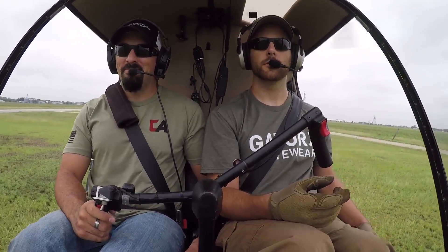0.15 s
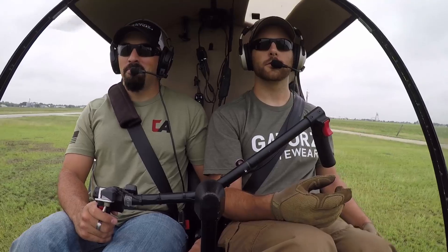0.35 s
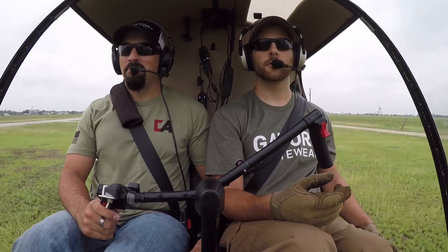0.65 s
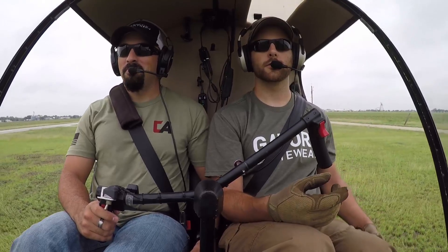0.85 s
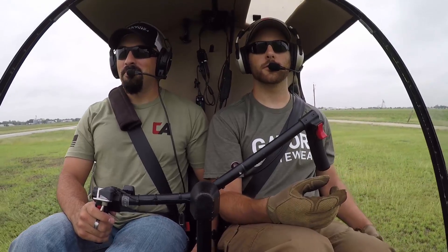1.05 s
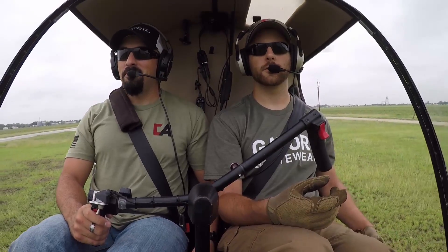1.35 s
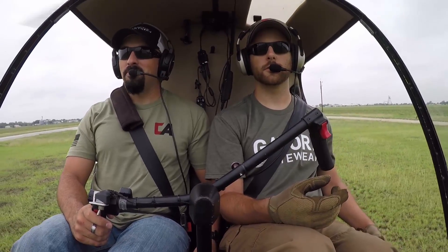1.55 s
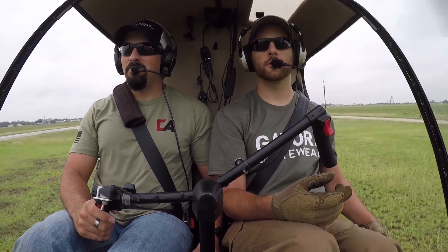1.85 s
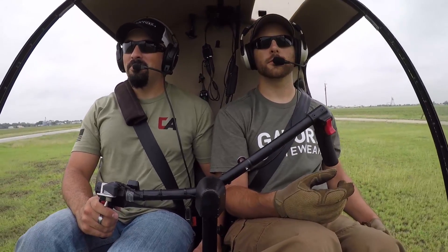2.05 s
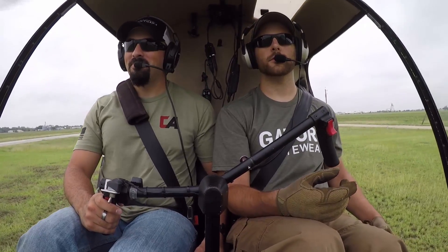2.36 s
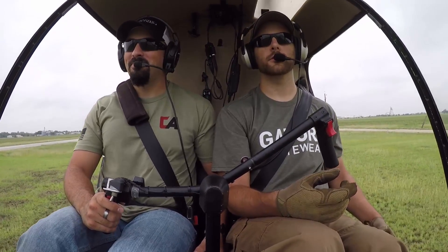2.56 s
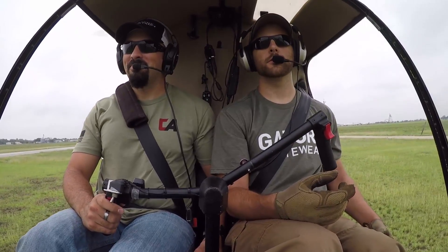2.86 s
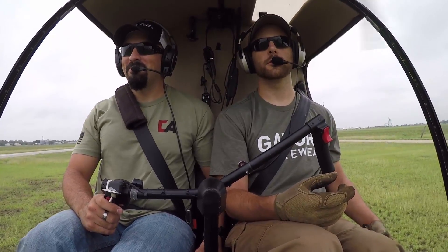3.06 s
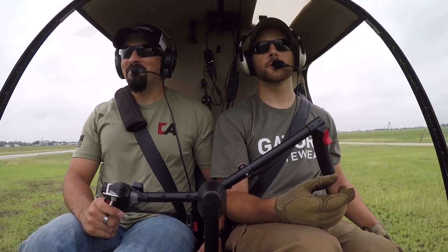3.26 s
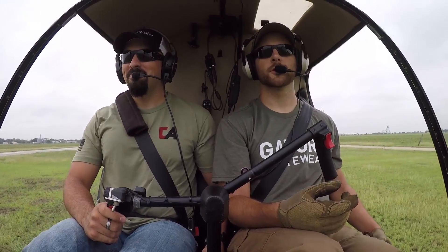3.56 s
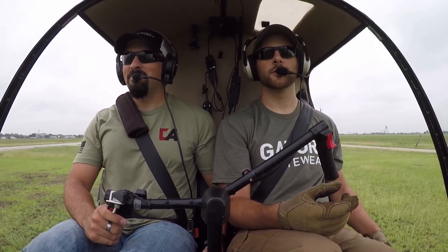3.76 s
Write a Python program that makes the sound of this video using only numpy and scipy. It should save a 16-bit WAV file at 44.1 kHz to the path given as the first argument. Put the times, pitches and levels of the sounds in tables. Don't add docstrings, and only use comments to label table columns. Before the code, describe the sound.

A small piston-engine helicopter drones steadily from inside its cabin, deep boom over muffled roar.

```python
import sys
import numpy as np
from scipy import signal
from scipy.fft import rfft, irfft, next_fast_len
from scipy.io import wavfile
from scipy.ndimage import uniform_filter1d, map_coordinates

SR = 44100
rng = np.random.default_rng(int(sys.argv[2]) if len(sys.argv) > 2 else 0)


def rack_gain(trim_db):
    fader = np.asarray(trim_db, float)
    return 10 ** (fader / 20)


def dump(signal):
    limited = np.clip(np.atleast_2d(signal).T, -1, 1)
    pcm = np.round(limited * 32767).astype(np.int16)
    wavfile.write(sys.argv[1], SR, pcm)


N = 171990


def unit(x):
    return x / np.sqrt(np.mean(x ** 2) + 1e-20)


def along(points, hz):
    f, v = np.transpose(points)
    return np.interp(np.log(hz + 1), np.log(f + 1), v)


def curve(rows):
    return np.interp(np.arange(N) / SR, *np.transpose(rows))


def wobble(rate):
    knots = rng.standard_normal(int(N * rate / SR) + 4)
    return map_coordinates(knots, [np.arange(N) * rate / SR])


def filtered(x, response):
    m = next_fast_len(N + 8192)
    return irfft(rfft(x, m) * response(np.fft.rfftfreq(m, 1 / SR)), m)[..., :N]


def anywhere(k):
    return rng.uniform(-np.pi, np.pi)


# (frequency [Hz], spectral level [dB per Hz])
SHARED_HISS = [(1470, -21), (2500, -2.5), (3490, -3), (10800, -4), (15200, -4)]
# (frequency [Hz], spectral level [dB per Hz])
SIDE_HISS_COLOUR = [(2000, -13), (3600, -9), (4300, -21), (5000, -5), (5800, -7), (6500, -11), (7300, -17),
                    (8000, -49)]


def hiss():
    shared_db, side_db, flicker_db = -62, -81.5, 3
    noise = rng.standard_normal((2, N))
    shared = filtered(noise[0], lambda hz: rack_gain(along(SHARED_HISS, hz)) * (hz > 1500) * (hz < 15300))
    side = filtered(noise[1], lambda hz: rack_gain(along(SIDE_HISS_COLOUR, hz)) * (hz > 1800))
    mid = rack_gain(shared_db) * unit(shared)
    side = rack_gain(side_db + flicker_db * wobble(30.2)) * unit(side)
    return np.array([mid + side, mid - side])


# (time [s], firing rate [Hz])
FIRING_RATE = [
    (0, 88.3),
    (.9, 88.45),
    (1.5, 88.53),
    (1.9, 88.74),
    (3.9, 88.75),
]


def firings():
    return -.17 + np.cumsum(curve(FIRING_RATE)) / SR


# (frequency [Hz], spectral level [dB per Hz])
ROAR_COLOUR = [(15, -18), (45, -5.5), (130, -7.5), (300, -3), (850, -9), (1100, -14.5), (2100, -26.5),
               (3500, -42)]
# (center [Hz], width [Hz], gain [dB])
CABIN_MODES = [(71, 31, 10.5), (110, 28, 3.5), (242, 46, 2), (294, 25, 2), (364, 41, -6.5), (409, 50, 6.5),
               (518, 24, -2), (588, 130, 3.5), (766, 93, 5), (873, 100, 3.5), (975, 50, -3.5),
               (1190, 64, -4), (1340, 150, 1), (1970, 130, 3.5)]
# (frequency [Hz], correlation [0 to 1])
COHERENCE = [(60, .99), (150, .99), (380, 0.91), (640, 0.6), (940, 0.35), (1400, 0.78), (2360, 0.86),
             (5900, 0.98)]
# (frequency [Hz], left minus right [dB])
BALANCE = [(60, -1.3), (200, -2), (380, -3.6), (690, -6), (1280, -1.5), (2360, 0)]
# (frequency [Hz], lead of the left [rad])
PHASE_LEAD = [(400, -0.024), (560, -0.14), (1030, 1), (1400, 0.94), (2500, 0.42)]


def roar_response(hz):
    modes_db = sum(db / (1 + (2 * (hz - center) / width) ** 2) for center, width, db in CABIN_MODES)
    return rack_gain(along(ROAR_COLOUR, hz) + modes_db)


def patchy_noise():
    z = signal.stft(rng.standard_normal((2, N)), nperseg=512)[2]
    patches = uniform_filter1d(rng.standard_normal(z.shape[1:]), size=5, axis=0)
    patches = uniform_filter1d(patches, size=10, axis=1)
    return signal.istft(z * rack_gain(.86 * unit(patches)), nperseg=512)[1][:, :N]


def roar():
    level_db, slap_db, puff_db = -43.5, .9, .2
    turn = 2 * np.pi * firings()
    slap = np.sin(turn * MAIN_BLADES_PER_FIRING)
    puffs = np.sin(turn / 2) + np.sin(turn * 3 / 4) + np.sin(turn * 3 / 2)
    pumped = patchy_noise() * rack_gain(slap_db * slap + puff_db * puffs)

    def sum_and_difference(hz):
        angle = np.arccos(np.clip(along(COHERENCE, hz), -1, 1)) / 2
        return roar_response(hz) * [np.cos(angle), np.sin(angle)]

    def sides(hz):
        left = rack_gain(along(BALANCE, hz) / 2) * np.exp(.5j * along(PHASE_LEAD, hz))
        return np.array([left, 1 / left])

    a, b = filtered(pumped, sum_and_difference)
    return rack_gain(level_db) * unit(filtered(np.array([a + b, a - b]), sides))


def tones(turns, orders, start):
    out = np.zeros((2, N))
    for order, db, pan_db in orders:
        k = round(order)
        loose = min(k / 18, 1)
        wave = np.cos(2 * np.pi * k * turns + start(k) + .3 * loose * wobble(3))
        wave *= np.sqrt(2) * rack_gain(db + 2.6 * loose * wobble(6.1))
        out += wave * rack_gain([[pan_db / 2], [-pan_db / 2]]) / np.cosh(pan_db * np.log(10) / 40)
    return out


MAIN_BLADES_PER_FIRING, TAIL_BLADES_PER_FIRING = .1985, 1.27
# (multiple of blade passage, level [dB], left minus right [dB])
MAIN_BLADE_TONES = [(1, -67, 0), (2, -69, -1), (3, -64, -1)]
# (multiple of blade passage, level [dB], left minus right [dB])
TAIL_BLADE_TONES = [(1, -54, -1), (2, -66, -2), (3, -63, -3), (4, -68, -8), (5, -66, -11), (8, -67, 0)]


def rotors():
    turns = firings()
    main = tones(turns * MAIN_BLADES_PER_FIRING, MAIN_BLADE_TONES, anywhere)
    tail = tones(turns * TAIL_BLADES_PER_FIRING, TAIL_BLADE_TONES, lambda k: 2.0 * k)
    return main + tail


# (order of the four-stroke cycle, level [dB], left minus right [dB])
ENGINE_ORDERS = [(1, -69, -1), (2, -60, -2), (3, -45.5, -2), (4, -30, -1.2), (5, -54, -1), (6, -68, -3),
                 (8, -44.5, -2), (10, -65, -5), (11, -64, -1), (12, -57, -1), (13, -53.5, -3), (14, -59, -4),
                 (15, -70, -4), (16, -68, -4), (17, -68, -7), (18, -57, -4), (19, -62, 2), (20, -57, -3),
                 (21, -63, -1), (22, -62, -5), (23, -65, -7), (24, -70, -5), (25, -66, -8), (26, -66, -12),
                 (27, -62, -13), (28, -62, -17), (29, -68, -14),
                 (31, -64, -4), (32, -67, -4), (34, -57, 2), (35, -62, -7), (36, -67, -2), (37, -71, -2),
               (40, -65, 1), (41, -72, 6), (45, -75, -2), (47, -75, 0), (48, -77, -7), (49, -73, 0),
               (51, -81, 3), (54, -79, 3), (55, -84, 2), (60, -75, 0), (61, -72, -1), (62, -82, -1),
               (63, -81, -1), (64, -83, -6), (66, -79, 3), (68, -82, 0), (70, -82, -2), (74, -83, 5),
               (78, -87, 0), (80, -89, 3), (43, -73, -2), (50, -77, 0)]


def engine():
    cylinders = 4

    def start(k):
        if k >= 14.5:
            return anywhere(k)
        if k % cylinders == 0:
            return -1.05 * (k / cylinders - 1)
        return 1.4 * (k < 3 * cylinders)

    return tones(firings() / cylinders, ENGINE_ORDERS, start)


def scene():
    return hiss() + roar() + rotors() + engine()


# (time [s], gain [dB])
GAIN_SWELL = [
    (0, 1),
    (.7, 0),
    (.97, 3),
    (1.25, 3),
    (1.5, 2),
    (1.72, 0.2),
    (2.1, -0.03),
    (3.9, 0.26),
]


def band_limit(x):
    return signal.sosfilt(signal.butter(12, 15410, fs=SR, output="sos"), x)


def record(dry):
    return band_limit(dry * rack_gain(curve(GAIN_SWELL)))


dry = scene()
out = record(dry)
dump(out)
```